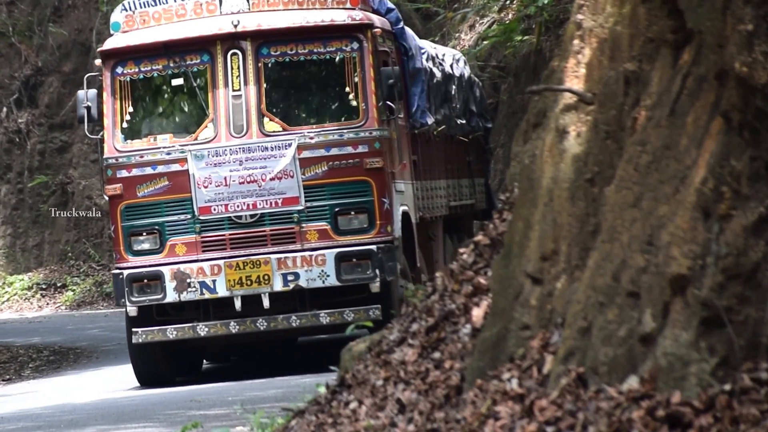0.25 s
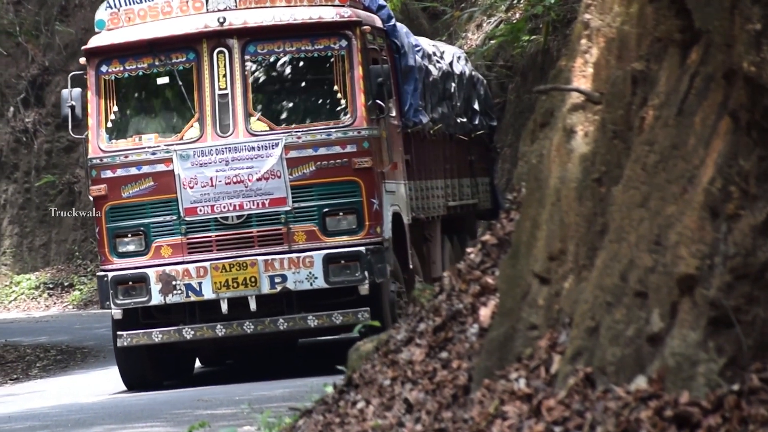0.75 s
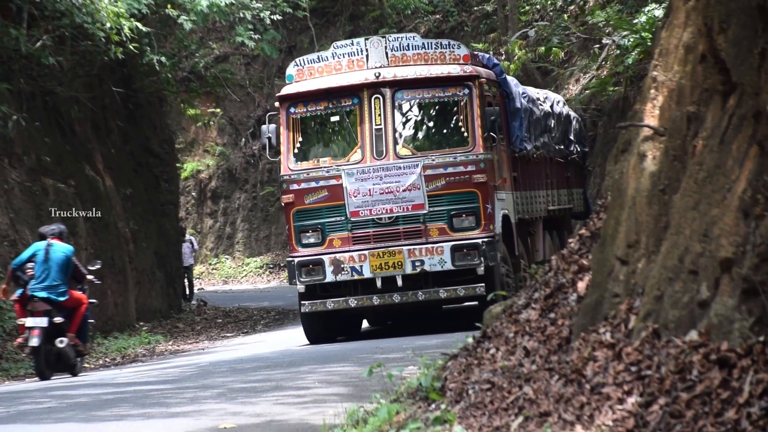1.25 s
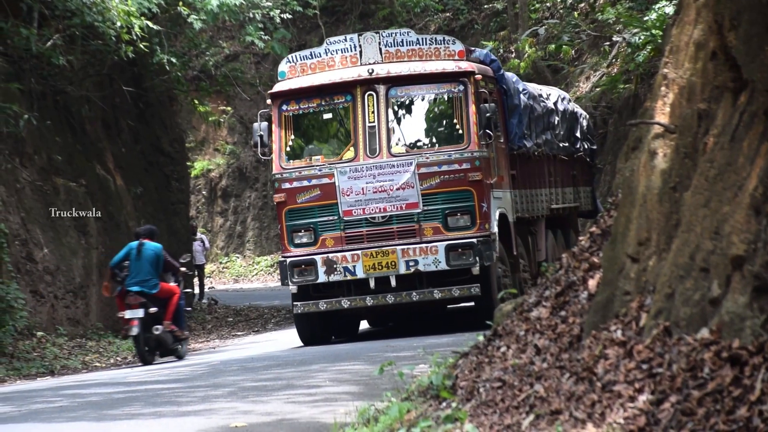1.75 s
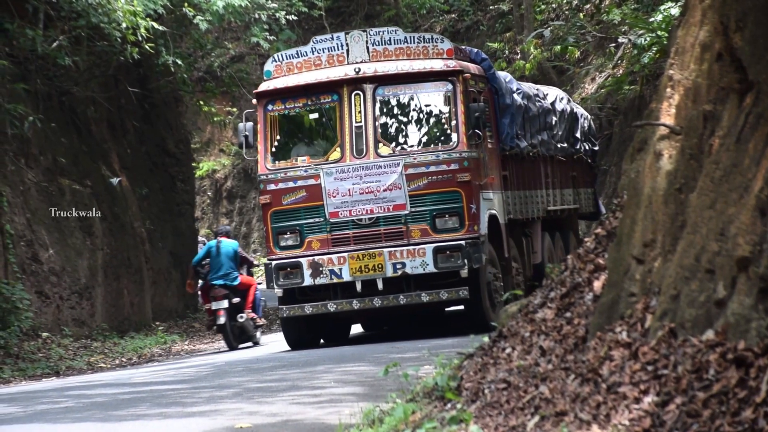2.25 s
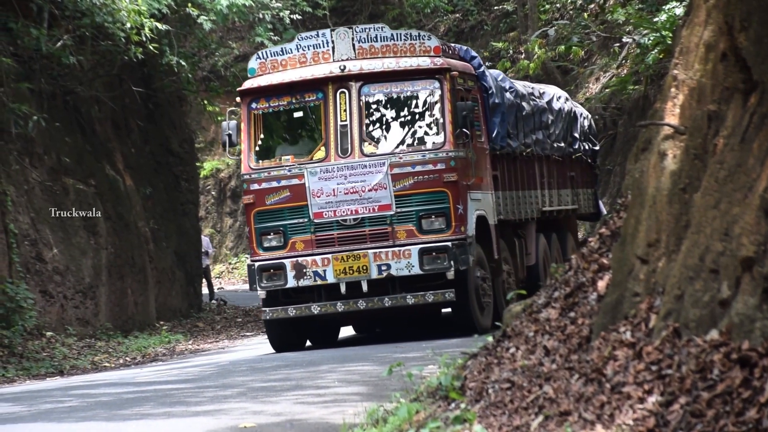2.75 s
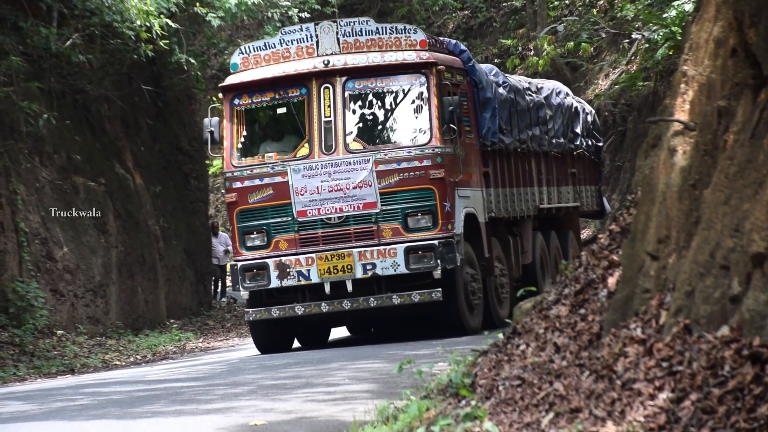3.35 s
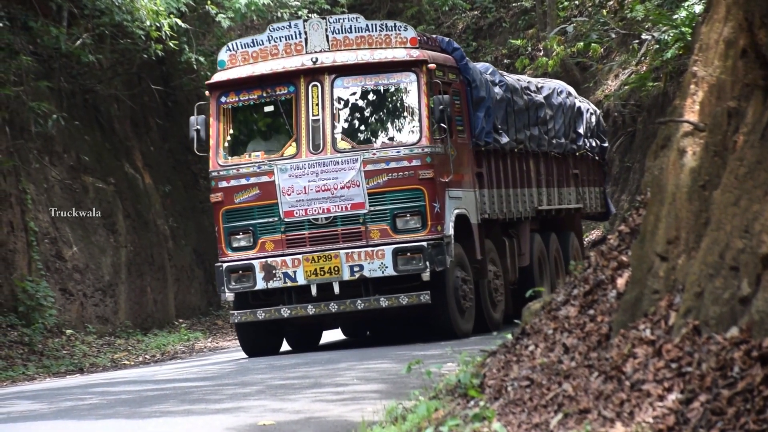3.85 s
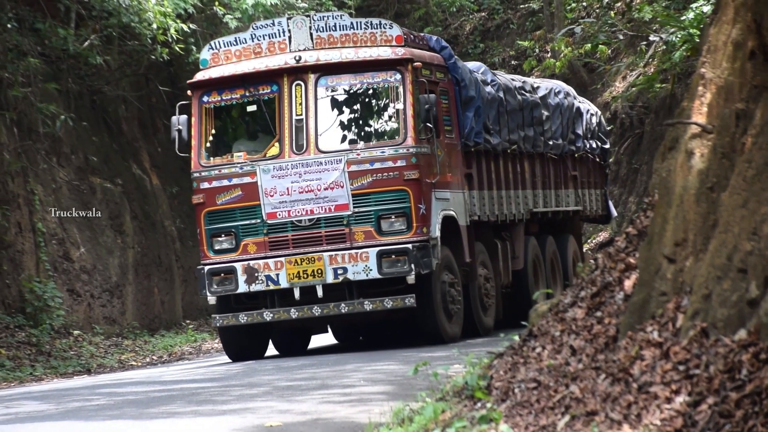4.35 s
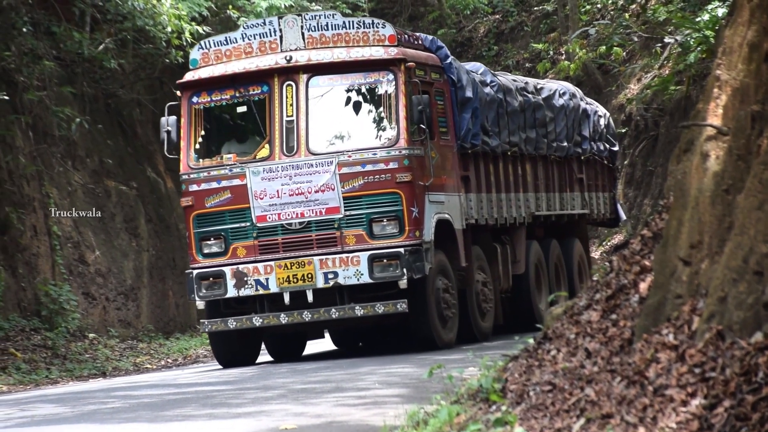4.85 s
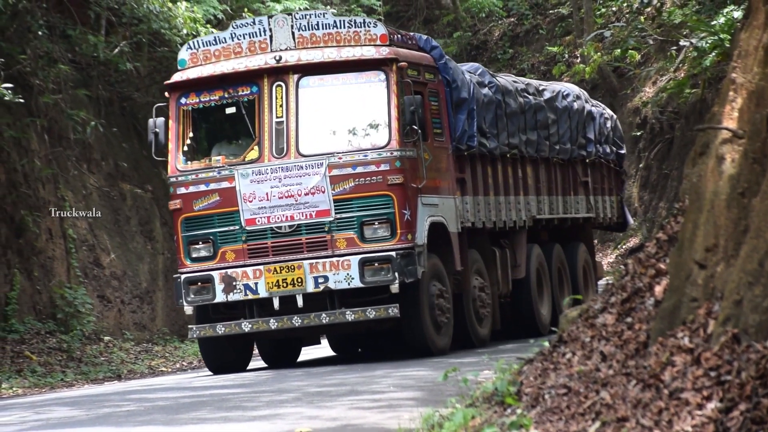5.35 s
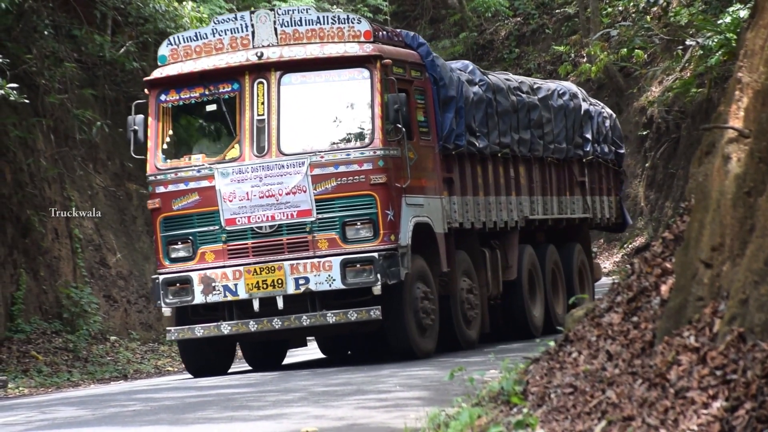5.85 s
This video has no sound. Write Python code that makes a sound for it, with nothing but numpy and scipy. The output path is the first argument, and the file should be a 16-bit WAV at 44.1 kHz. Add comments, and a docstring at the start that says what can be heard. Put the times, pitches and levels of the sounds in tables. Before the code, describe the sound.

A heavy lorry creeps along a forest road between earth banks, heard from the roadside in stereo. From 0 s there is steady diesel clatter, soft hiss and a faint, unsteady high brake squeal, with a motorcycle's low rumble and faint far tones near 0.3 s. At 1.1 s a short buzzing toot comes with a stronger squeal; at 1.25 s a very loud, brassy two-note air horn enters and holds until about 2.7 s, wavering, then echoing off slopes and leaves. Brakes sing again from 2.9 to 3.7 s. A weaker, more distant toot runs from 3.2 to 3.6 s, answered by two short horn blasts at 3.65 and 3.9 s. Engine clatter and hiss recover as the ducked level returns. Wavering squeals last from 4.45 to 5.9 s. A light tick at 5.55 s precedes a sharp, dry close crack near 5.68 s, with bass swelling briefly afterwards before 6 s.

```python
"""Lorry air horns on a forest road

A loaded lorry creeps between earth banks: noise and wavering low tones for the diesel, thin squeals for brakes.
A motorcycle (low rumble, buzzer horns) toots; twin air horns, summed reed partials, answer with three blasts.
Delays and a noise tail send them back from banks, slopes and trees. Near the end something snaps close by.
A gain control sinks under each blast.
"""
import sys
import numpy as np
from scipy import signal
from scipy.io import wavfile

SR = 44100
rng = np.random.default_rng(int(sys.argv[2]) if len(sys.argv) > 2 else 0)


def to_wav(sig):
    """Store sig (one row per channel, or 1-D mono) as 16-bit WAV at the path in sys.argv[1].

    Samples outside -1..1 are clipped; the rate is SR.
    """
    pcm = np.clip(np.atleast_2d(sig), -1, 1) * 32767
    pcm = np.round(pcm).astype(np.int16)
    wavfile.write(sys.argv[1], SR, pcm.T)  # frames by channels


N = 269010

# stereo field: [freq_hz, left_right_likeness 0..1]
LIKENESS = [(40, .5), (130, 0.27), (300, 0.94), (1500, 0.95), (5000, 0.82), (15000, 0.44)]
# stereo field: [freq_hz, left_over_right_db]
LEAN = [(60, -5), (150, -4), (500, 3), (2000, 1.5), (6000, 2.5), (15000, 0.5)]

# low tones of the engine cycle: [time_s, cycle_hz]
ENGINE_SPEED = [(0, 16.4), (3.3, 16.15), (4.2, 15.9), (6.1, 15.5)]
# [multiple_of_cycle, level_db]
ENGINE_ORDERS = [(6, -77.5), (12, -67.5), (14, -65.5), (15, -63.5), (17, -67.5), (18, -65), (22, -65),
                 (24, -66)]
# diesel noise colours, relative: [freq_hz, density_db_per_hz]
EXHAUST_COLOUR = [(35, -67), (60, -37), (80, -30), (220, -6.5), (300, 21), (390, -21), (660, -120)]
CLATTER_COLOUR = [(120, -70), (200, -16), (343, -12), (372, -11), (518, 5), (659, -5.5), (962, 1.5),
                  (2170, -3.5), (3100, -14), (4030, -7), (6820, -120)]
HISS_COLOUR = [(2500, -10.5), (3500, -5), (5000, 6), (7000, -16), (10000, -2), (12500, -57), (15500, -44)]
# panel resonances: [freq_hz, width_hz, db_relative_to_clatter]
PANELS = [(599, 12, -22.5), (788.4, 5, -13.5), (971, 46, -8), (1419, 9.9, -13), (1927, 40, -11.5)]
# hiss swells, perhaps air valves venting: [time_s, half_width_s, boost_db]
PUFFS = [(0.381, 0.24, 1), (1.2, 0.043, 5), (3.6, 0.18, 4.5), (5.17, 0.083, 6), (5.76, 0.11, 4.5)]
# bass level: strong early as the motorcycle passes, sunk mid-scene, swelling again near 5.8 s:
# [time_s, exhaust_offset_db, rumble_offset_db]
BASS_LEVELS = [(0, 5, 3), (1.0, 4, 9.5), (1.6, -20, -18), (3.2, -7, -27), (3.6, 0, -27), (5.3, -18, -20),
               (5.76, -1, 10), (6.1, -10, -12)]
FIRING_HZ = 31.5
EXHAUST_DB, CLATTER_DB, HISS_DB, RUMBLE_DB = -51, -37.5, -53.5, -66

# low rumble colour, relative: [freq_hz, density_db_per_hz]
RUMBLE_COLOUR = [(15, -66), (25, -36), (59, -14), (140, -17), (170, 0), (220, -25), (370, -120)]
# faint far tones: [start_s, end_s, pitch_hz, level_db]
FAR_TONES = [(0.23, 0.395, 604, -43.5), (0.254, 0.336, 758, -47)]

# brake squeals, one row per stretch of singing, some overlapping: [start_s, end_s, start_hz, end_hz, level_db]
SQUEALS = [(0.0, 1.078, 3300, 3300, -51), (1.107, 1.283, 3273, 3200, -38.5),
           (2.862, 3.148, 3280, 3300, -43), (3.233, 3.666, 3350, 3360, -44),
           (3.297, 3.655, 3262, 3280, -41.5), (3.53, 3.667, 2984, 2980, -44),
           (4.447, 5.202, 3270, 3294, -46), (5.214, 5.707, 3320, 3240, -44),
           (5.76, 5.903, 3260, 3240, -53.5)]
# [multiple_of_squeal_pitch, level_db]
SQUEAL_ORDERS = [(1, 3), (2, -20.5), (3, -47)]

# cracks: [start_s, level_db, pitch_hz, pitch_rise_fraction_per_ms, t60_s, crackle_share, left_over_right_db]
SNAPS = [(5.548, -31, 4100, 0, .02, .25, 3), (5.6724, -14, 2300, .17, .016, .06, -3),
         (5.6769, -4, 3300, 0, .006, .4, -4), (5.6777, -3, 3100, .15, .009, .2, 2),
         (5.679, -43, 5100, 0, .15, 0, 6), (5.6855, -25, 4000, 0, .012, .2, 3)]

# motorcycle horn pair: [pitch_hz]
TOOT_PITCHES = [283, 398]
# response of the tone disc: [freq_hz, level_db]
TOOT_DISC = [(270, -12), (420, -9), (560, -28), (1600, -20), (2700, -26), (3050, -8), (3220, 0),
             (3380, -22), (4200, -22), (6000, -36), (13000, -40)]
# motorcycle horns, the second time further off: [start_s, end_s, start_level_db]
TOOTS = [(1.094, 1.303, -33), (3.22, 3.64, -48)]
TOOT_SWELL_DB_PER_S = 11

# air horns, one row per press of the valve: [start_s, length_s, high_trumpet_db, low_trumpet_db]
BLASTS = [(1.247, 1.423, -12, -20.5), (3.652, 0.18, -12, -18), (3.877, 0.19, -10, -20)]
# trumpet partials: [multiple_of_trumpet_pitch, level_db]
HIGH_ORDERS = [(2, 2), (4, -6.5), (5, -8), (6, -15), (7, -12), (8, -22), (9, -15.5), (10, -17.5), (11, -21),
               (12, -22.5)]
LOW_ORDERS = [(1, -14), (2, -15), (3, -6.5), (4, -6), (5, -5.5), (6, -3.5), (7, -8), (8, -16), (9, -11),
              (10, -15.5), (11, -14), (12, -16.5), (13, -27.5), (14, -19)]
# level of all partials above the listed ones: [freq_hz, level_db]
TREBLE = [(4800, -28), (8500, -27.5), (11000, -37.5), (14500, -47)]
# sum and difference tones: [multiple_of_high, multiple_of_low, level_db]
CROSS_TONES = [(-1, 3, -36), (-1, 4, -30.5), (3, -1, -26.5), (1, 2, -26.5), (-2, 6, -35.5), (2, 1, -42),
               (-1, 5, -35), (4, -1, -23), (1, 3, -25), (2, 2, -27.5), (-1, 6, -29), (3, 1, -32.5),
               (1, 4, -22), (5, -1, -36), (2, 3, -22.5), (3, 2, -30), (4, 1, -32), (2, 4, -23), (3, 3, -30),
               (4, 2, -25.5), (1, 6, -45), (3, 5, -34.5)]
# high trumpet wavering as it sounds: [time_s, whole_tone_db, third_partial_db, first_partial_db]
WAVER = [(1.3, 0, -0.5, -6), (1.5, -5, -13, -7.5), (1.68, -4.5, -27, -17), (1.8, -2, -0.5, -4),
         (1.93, -1, -4, -19), (2.05, -1.5, -2, -7.5), (2.3, -1.5, -3, -11), (2.39, 1.5, -7, -24),
         (2.47, 1, 0, -11), (2.62, -3, 4.5, -22), (2.7, -10.5, -6.5, 4), (3.0, -8, -3, 3),
         (3.68, -1, -7, -0.5), (3.73, 1, 0, -9), (3.84, -2, -4.5, 0), (3.9, -1, 2, -2), (4.05, -4, -2, -2),
         (4.12, -2.5, -11, -0.5)]
# colour of the rushing air, relative: [freq_hz, density_db_per_hz]
HORN_AIR = [(250, -27), (600, -13), (1000, -1.5), (2000, 5), (3500, -3.5), (6000, -10), (10000, -14),
            (15500, -40)]
HIGH_HZ, LOW_TO_HIGH_PITCH = 445.5, 7 / 9
# each reed starts weak and comes up to strength
HIGH_SPEAKS_S, LOW_SPEAKS_S, SPEAKS_FROM_DB = 0.09, 0.0027, -7.5
# after a rest the air line takes a while to give full pressure
REFILL_S, BUILD_S, BUILD_DB = 0.5, 0.17, -1
# once the valve shuts; the high trumpet's first partial lingers
HIGH_DIES_DB_PER_S, LOW_DIES_DB_PER_S, FIRST_DIES_DB_PER_S = 178, 235, 119
DULLS_DB_PER_S = 279   # at 8 kHz: the edge of the tone goes first
# high trumpet's odd partials; the first flares with the puff
FIRST_DB, THIRD_DB, FIRST_FLARE_DB = -15.5, -2, 10

# banks and slopes: [delay_s, level_db, left_over_right_db]
ECHOES = [(.011, -20, 4), (0.035, -18.5, -10), (.175, -12.5, 3.5), (0.271, -23.5, 2)]
FOREST_T60_S, FOREST_TAIL_DB = 1.27, -48.5
FOREST_LOW_CUT_HZ, FOREST_HIGH_CUT_HZ = 1150, 13400
LEAVES_SWAY_S = 0.0001   # moving leaves change the length of every path

# gain control: cut in dB per dB above the threshold
GAIN_FROM_DB, GAIN_SHARE, GAIN_LISTENS_S, GAIN_MOVES_S = -25, 0.53, 0.01, 0.082
WIND_CUT_HZ, TOP_CUT_HZ = 115, 16300


def amp(db):
    """Amplitude ratio from dB."""
    return 10 ** (np.asarray(db) / 20)


def rms_one(x):
    """Scale to rms 1."""
    return x / np.sqrt(np.mean(x ** 2) + 1e-20)


def in_time(rows):
    """Each column of a time table, interpolated over the scene."""
    s, *columns = np.transpose(rows)
    return [np.interp(np.arange(N) / SR, s, c) for c in columns]


def gate(rows, fade_s):
    """One from first to last row time, with ramps just outside."""
    t = np.arange(N) / SR
    inside_s = np.minimum(t - rows[0][0] + fade_s, rows[-1][0] + fade_s - t)
    return np.clip(inside_s / fade_s, 0, 1)


def at_hz(points, hz):
    """Table value at a frequency, on a log axis."""
    table = np.array(points)
    return np.interp(np.log(hz), np.log(table[:, 0]), table[:, 1])


def panned(x, lean_db):
    """Stereo pair with the given left-over-right level."""
    return x * amp(np.array([[.5], [-.5]]) * lean_db)


def drift(rate_hz):
    """Slow random wander of spread 1: low-passed noise at SR / 40."""
    r = np.exp(-80 * np.pi * rate_hz / SR)
    white = rng.standard_normal(N // 40 + 2002)
    slow = signal.lfilter([1], [1, -2 * r, r * r], white)[2000:]   # drop the settling
    return np.interp(np.arange(N) / 40, np.arange(len(slow)), rms_one(slow - slow.mean()))


def turns(hz):
    """Running phase in radians."""
    return 2 * np.pi * np.cumsum(hz * np.ones(N)) / SR


def smooth(x, seconds):
    """One-pole lag."""
    r = np.exp(-1 / (seconds * SR))
    return signal.lfilter([1 - r], [1, -r], x)


def bandpass(low_hz, high_hz):
    """Second-order Butterworth band."""
    return signal.butter(2, [low_hz, high_hz], "band", fs=SR, output="sos")


def highpass(order, hz):
    """Butterworth low cut."""
    return signal.butter(order, hz, "high", fs=SR, output="sos")


def banded_noise(spectrum, patchy_db):
    """Half-octave bands of stereo noise, each with its own level, flicker, likeness and lean; rms 1."""
    octaves = np.log2(spectrum[-1][0] / spectrum[0][0])
    edges = spectrum[0][0] * 2 ** np.arange(0, octaves + .3, .5)
    white = rng.standard_normal((2, 2, N))
    out = 0
    for k, (low, high) in enumerate(zip(edges, np.minimum(edges[1:], 19000))):
        # neighbouring bands use different noise
        mid, side = signal.sosfilt(bandpass(low, high), white[k % 2])
        hz = np.sqrt(low * high)
        alike = np.clip(at_hz(LIKENESS, hz), 0, 1)
        pair = np.sqrt(1 + alike) * mid + np.sqrt(1 - alike) * side * [[1], [-1]]
        level = amp(at_hz(spectrum, hz) + patchy_db * drift(18.0))
        out = out + level * panned(pair, at_hz(LEAN, hz))
    return rms_one(out)


def drone():
    """Low orders of the engine cycle stand out of the exhaust as wavering tones."""
    phase = turns(in_time(ENGINE_SPEED)[0] * (1 + 0.0024 * drift(2.8)))
    out = 0
    for k, db in ENGINE_ORDERS:
        tone = np.sin(k * phase + rng.uniform(0, 2 * np.pi))
        out = out + amp(db + 3.1 * drift(2.3)) * np.sqrt(2) * tone
    return out


def diesel():
    """Each firing lifts the exhaust, clatter and hiss noise; resonant panels add steady coloured noise."""
    t = np.arange(N) / SR
    exhaust_db = EXHAUST_DB + in_time(BASS_LEVELS)[0]
    hiss_db = HISS_DB + sum(db * np.exp(-((t - s) / width) ** 2) for s, width, db in PUFFS)
    firings = turns(FIRING_HZ * (1 + 0.033 * drift(0.96))) / (2 * np.pi)
    knock = np.exp(-2.5 * (firings % 1))
    clatter = banded_noise(CLATTER_COLOUR, patchy_db=1.06) * (1 + 0.12 * knock)
    shake = rng.standard_normal(N)
    for hz, width_hz, db in PANELS:
        r = np.exp(-np.pi * width_hz / SR)
        poles = [1, -2 * r * np.cos(2 * np.pi * hz / SR), r * r]
        clatter = clatter + amp(db) * rms_one(signal.lfilter([1, 0, -1], poles, shake))
    exhaust = banded_noise(EXHAUST_COLOUR, patchy_db=0) * (1 + .5 * knock)
    hiss = banded_noise(HISS_COLOUR, patchy_db=0.8) * (1 + .5 * knock)
    out = amp(exhaust_db) * rms_one(exhaust)
    out = out + amp(CLATTER_DB) * rms_one(clatter)
    return out + amp(hiss_db) * rms_one(hiss)


def motorcycle():
    """Lumpy low rumble: flickering bands of bass noise."""
    level_db = RUMBLE_DB + in_time(BASS_LEVELS)[1]
    return amp(level_db) * banded_noise(RUMBLE_COLOUR, patchy_db=2)


def far_tones():
    """Soft short sines."""
    return sum(amp(db) * gate([(start,), (end,)], fade_s=.02) * np.sin(turns(hz))
               for start, end, hz, db in FAR_TONES)


def brakes():
    """Stick and slip at the lining keeps the drum singing, unsteady in pitch and level, now and then sagging."""
    out = 0
    for start, end, from_hz, to_hz, db in SQUEALS:
        rows = [(start, from_hz), (end, to_hz)]
        phase = turns(in_time(rows)[0] + 10.6 * drift(25.2) + 5 * drift(3))
        flutter_db = 2.8 * drift(48) + 8 * np.minimum(drift(5.3) + 0.35, 0)
        tone = sum(amp(order_db) * np.sin(k * phase) for k, order_db in SQUEAL_ORDERS)
        out = out + np.sqrt(2) * gate(rows, fade_s=0.0094) * amp(db + flutter_db) * tone
    return out


def snaps():
    """Short dry cracks: decaying rings, some climbing in pitch, most with crackle on top."""
    out, t = np.zeros((2, N)), np.arange(5000) / SR
    crackle = signal.sosfilt(bandpass(3500, 13000), rng.standard_normal((len(SNAPS), len(t))))
    for (s, db, hz, rise, t60, share, lean_db), noise in zip(SNAPS, crackle):
        at = round(s * SR)
        ring = np.sin(2 * np.pi * hz * t * (1 + 500 * rise * t))   # rise per ms, integrated
        burst = amp(db - 60 * t / t60) * (ring + share * noise)
        out[:, at:at + len(t)] += panned(burst, lean_db)
    return signal.sosfilt(highpass(2, 900), out)


def toot():
    """Two buzzer horns whose upper partials ring the tone disc and flutter."""
    tone = 0
    for hz in TOOT_PITCHES:
        for k in range(1, int(7000 / hz)):
            level_db = at_hz(TOOT_DISC, k * hz) + min(k / 3, 3.5) * drift(30)
            tone = tone + amp(level_db) * np.sin(k * turns(hz * (1 + .002 * drift(40))))
    t = np.arange(N) / SR
    level = 0
    for start, end, db in TOOTS:
        swell_db = TOOT_SWELL_DB_PER_S * np.clip(t - start, 0, end - start)
        level = level + gate([(start,), (end,)], fade_s=0.01) * amp(db + swell_db)
    return tone * level


def partial(phase, hz, db, steady=False):
    """One tone; the higher, the more it swells, fades and leans as the paths off road and banks shift."""
    unsteady = .2 if steady else np.clip(np.log2(hz / 600) / 1.5, .2, 1.3)
    tone = np.sin(phase + rng.uniform(0, 2 * np.pi))
    tone = np.sqrt(2) * amp(db + 3 * unsteady * drift(4)) * tone
    return panned(tone, 3.7 * unsteady * drift(2.8) + at_hz(LEAN, hz))


def trumpet(phase, hz, orders, bright_db):
    """Partials of a beating reed; above the listed ones they fall off smoothly. bright_db acts at 8 kHz."""
    first_upper = int(orders[-1][0]) + 1
    upper = [(k, at_hz(TREBLE, k * hz)) for k in range(first_upper, int(TREBLE[-1][0] / hz))]
    out = 0
    for k, db in orders + upper:
        tilt = max(np.log2(k * hz / 1000), 0) / 3
        out = out + partial(k * phase, k * hz, db + bright_db * tilt)
    return out


def rests():
    """How far the air line has settled before each blast, 0 to 1."""
    start, length = np.transpose(BLASTS)[:2]
    return 1 - np.exp((np.roll(length, 1) - np.diff(start, prepend=-np.inf)) / REFILL_S)


def blown(level_db, speaks_s, dies_db_per_s):
    """Strength of one reed: it speaks, builds with the line pressure, holds, and dies when the valve shuts."""
    t, out = np.arange(N) / SR, 0
    for (start, length, *_), db, rested in zip(BLASTS, level_db, rests()):
        age = np.maximum(t - start, 0)
        rise_db = SPEAKS_FROM_DB * np.exp(-age / speaks_s) + rested * BUILD_DB * np.exp(-age / BUILD_S)
        fall_db = dies_db_per_s * np.maximum(age - length, 0)
        opened = np.clip((t - start) / 0.0046 + 1, 0, 1)
        out = np.maximum(out, opened * amp(db + rise_db - fall_db))
    return out


def air_horns():
    """Two trumpets on one air line: each reed shakes the other's supply, adding sum and difference tones."""
    starts, _, high_db, low_db = np.transpose(BLASTS)
    whole_db, third_db, first_db = in_time(WAVER)
    high_on = amp(whole_db) * blown(high_db, HIGH_SPEAKS_S, HIGH_DIES_DB_PER_S)
    low_on = blown(low_db, LOW_SPEAKS_S, LOW_DIES_DB_PER_S)
    high_hz, low_hz = HIGH_HZ, LOW_TO_HIGH_PITCH * HIGH_HZ
    t = np.arange(N) / SR

    # the first puff drives the pitch sharp
    rush = sum(rested * (t > s - .01) * np.exp(-np.maximum(t - s, 0) / .012)
               for s, rested in zip(starts, rests()))
    bent_hz = high_hz * (1 + 0.0616 * rush + 0.001085 * drift(3.68) + 0.0011 * drift(62))
    high_phase, low_phase = turns(bent_hz), turns(LOW_TO_HIGH_PITCH * bent_hz)

    # the edge of the tone comes once the reeds beat fully
    ends = np.append(starts[1:], np.inf)
    shut_s = sum((t < end - .01) * np.clip(t - s - length, 0, .1)
                 for (s, length, *_), end in zip(BLASTS, ends))
    edge_db = -0.4 - 12 * rush - DULLS_DB_PER_S * shut_s
    high = trumpet(high_phase, high_hz, HIGH_ORDERS, edge_db)
    low = trumpet(low_phase, low_hz, LOW_ORDERS, edge_db)

    cross = sum(partial(m * high_phase + n * low_phase, m * high_hz + n * low_hz, db)
                for m, n, db in CROSS_TONES)
    rasp = signal.sosfilt(highpass(4, 2700), high * low)   # the dense upper cross tones
    air = (1 + 1.0 * rush) * banded_noise(HORN_AIR, patchy_db=2.0)
    both_on = amp(8.5) * np.sqrt(high_on * low_on)
    shared = both_on * (cross + amp(-24.5) * rasp + amp(-16.5) * air)

    first = partial(high_phase, high_hz, FIRST_DB + first_db + FIRST_FLARE_DB * rush)
    first = first * blown(high_db, LOW_SPEAKS_S, FIRST_DIES_DB_PER_S)
    third = partial(3 * high_phase, 3 * high_hz, THIRD_DB + third_db, steady=True)
    third = third * blown(high_db, LOW_SPEAKS_S, HIGH_DIES_DB_PER_S)
    return first + third + high_on * high + amp(1.5) * low_on * low + shared


def forest(x):
    """Distinct echoes, then a diffuse tail, partly separate per ear; leaves return little bass and break it up."""
    out, t = np.zeros((2, N)), np.arange(int(1.5 * SR)) / SR
    x = np.interp(np.arange(N) + LEAVES_SWAY_S * SR * drift(8.05), np.arange(N), x)
    for delay_s, db, lean_db in ECHOES:
        lag = round(delay_s * SR)
        out[:, lag:] += panned(amp(db + 2.5 * drift(8.6)[lag:]) * x[:-lag], lean_db)
    scatter = rng.standard_normal(len(t)) + .5 * rng.standard_normal((2, len(t)))
    tail = amp(FOREST_TAIL_DB - 60 * t / FOREST_T60_S) * scatter
    out += signal.fftconvolve(x[None], tail, axes=1)[:, :N]
    out = signal.sosfilt(highpass(2, FOREST_LOW_CUT_HZ), out)
    return signal.sosfilt(signal.butter(1, FOREST_HIGH_CUT_HZ, fs=SR, output="sos"), out)


def scene():
    """Direct sources plus the forest's return of air horns, toots, squeals, far tones and snaps."""
    horns, cracks = air_horns(), snaps()
    thin_tones = toot() + brakes() + far_tones()
    echoes = forest(horns.mean(axis=0) + amp(1) * thin_tones + amp(-20) * cracks[0])
    return horns + panned(thin_tones, 3.1) + cracks + echoes + diesel() + drone() + motorcycle()


def record(dry):
    """Late-acting gain control, rounding of the highest peaks, a wind filter thinning the bass, a top cut."""
    level_db = 10 * np.log10(smooth(np.mean(dry ** 2, axis=0), GAIN_LISTENS_S) + 1e-12)
    excess_db = np.maximum(level_db - GAIN_FROM_DB, 0)
    cut_db = GAIN_SHARE * smooth(smooth(excess_db, GAIN_MOVES_S), GAIN_MOVES_S)
    held = dry * amp(-cut_db)
    rounded = held / (1 + (held / .8) ** 4) ** (1 / 4)
    thinned = signal.sosfilt(highpass(2, WIND_CUT_HZ), rounded)
    return signal.sosfilt(signal.cheby2(12, 70, TOP_CUT_HZ, fs=SR, output="sos"), thinned)


dry = scene()
out = record(dry)
to_wav(out)
```